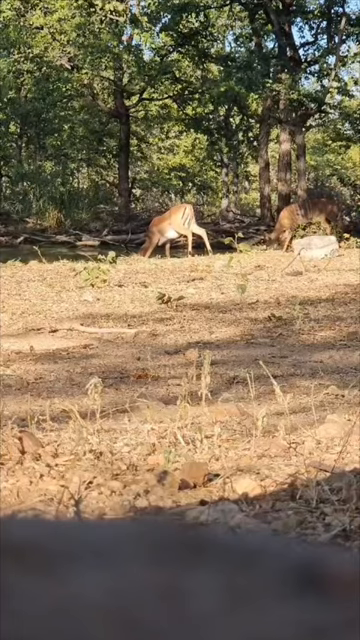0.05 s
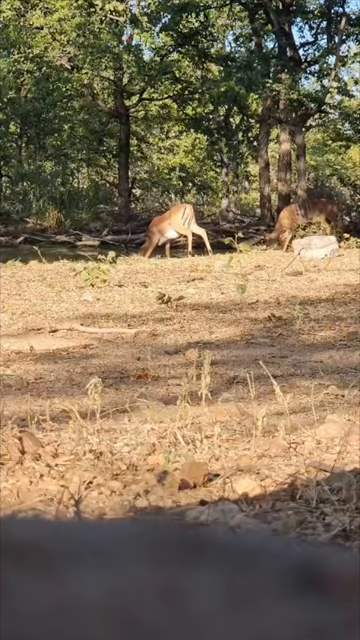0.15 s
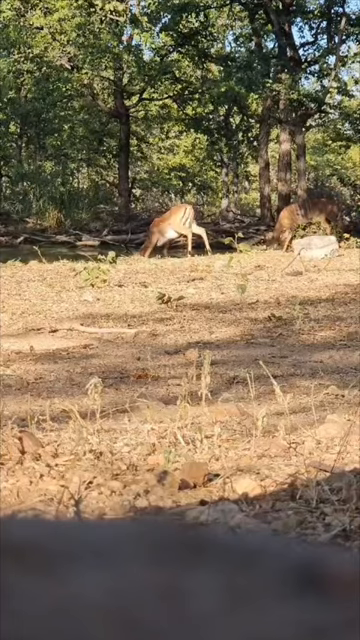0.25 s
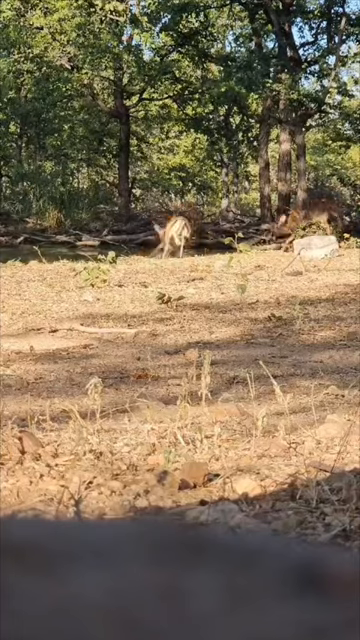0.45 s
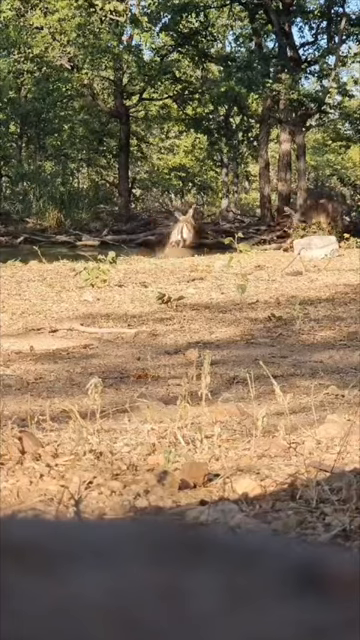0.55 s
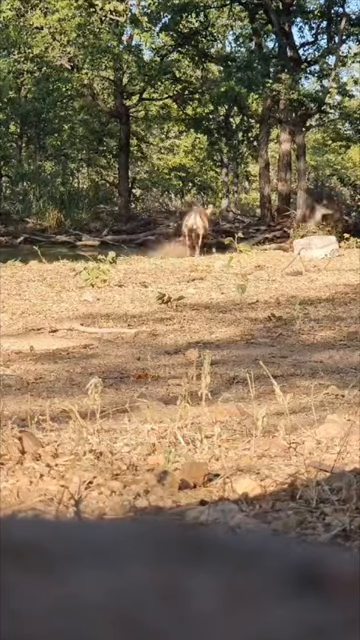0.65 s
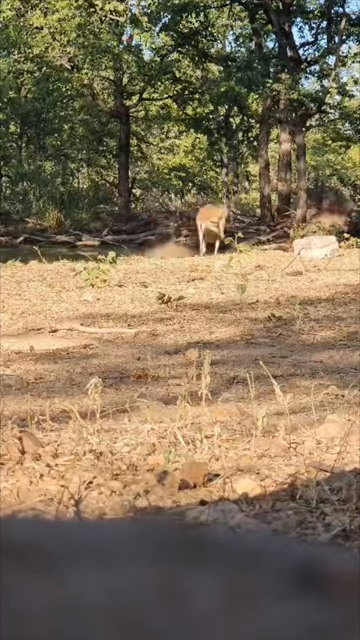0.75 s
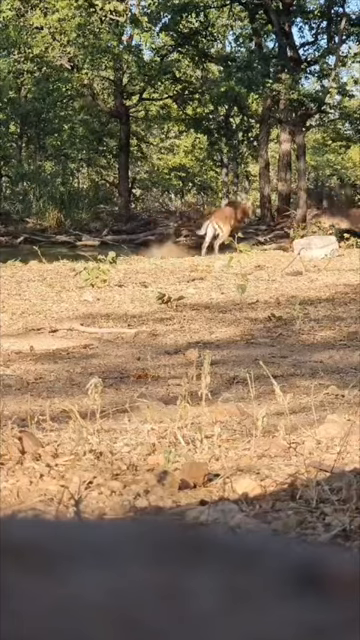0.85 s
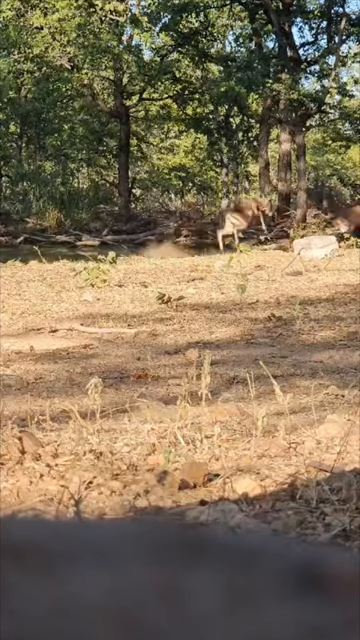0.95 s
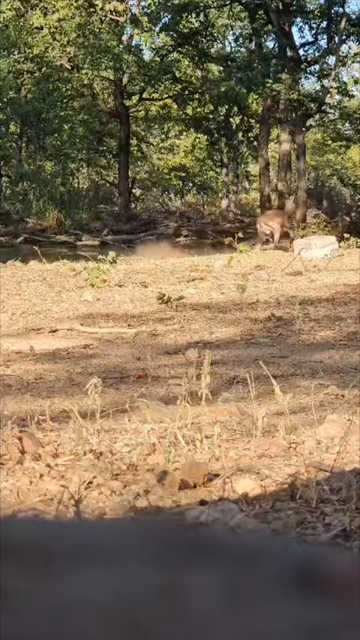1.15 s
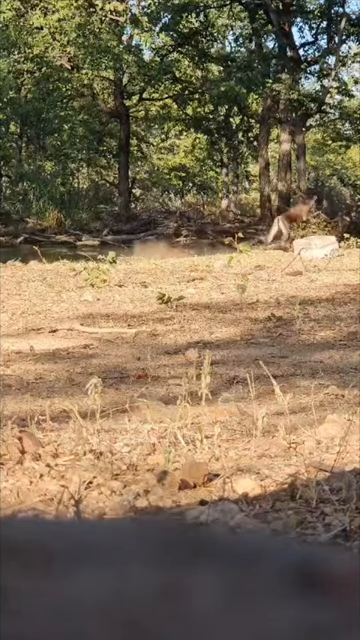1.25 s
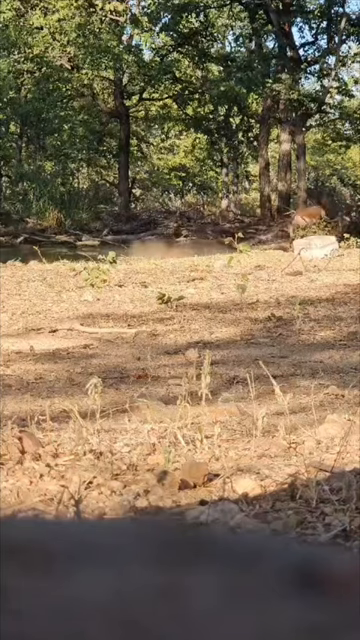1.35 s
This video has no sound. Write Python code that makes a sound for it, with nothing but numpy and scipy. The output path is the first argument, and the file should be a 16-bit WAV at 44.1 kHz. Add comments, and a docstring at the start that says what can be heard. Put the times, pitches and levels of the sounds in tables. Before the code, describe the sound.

Close to the microphone in a small hide, a bow shoots with a brief scrape and a loud, rattling twang. A quieter arrow hit follows out in the bush, and antelope bolt with soft thuds and dry rustling.

```python
"""A bow is shot inside a small hide: the arrow scrapes over its rest, the string slams home and twangs,
the fittings clack and ring, and the hide booms. The arrow hisses off and a quarter of a second later
smacks into an antelope, echoing from bush and tree line. The animals bolt over dry ground, hooves
thudding and scuffing. Whatever rings is a set of wavering sines; the rest is shaped noise."""
import sys
import numpy as np
from scipy import signal
from scipy.fft import rfft, irfft, next_fast_len
from scipy.io import wavfile
from scipy.ndimage import uniform_filter1d, minimum_filter1d, map_coordinates

SR = 44100
rng = np.random.default_rng(int(sys.argv[2]) if len(sys.argv) > 2 else 0)


def output_pcm(signal):
    """Save a mono or channel-first signal as 16-bit PCM at the path in sys.argv[1].

    Samples are clipped to [-1, 1] before scaling.
    """
    pcm = np.clip(np.atleast_2d(signal).T, -1, 1) * 32767
    wavfile.write(sys.argv[1], SR, np.round(pcm).astype(np.int16))


N = 61739
LOOSE_S, STOP_S, HIT_S = .1995, .2238, .4765  # string let go, string slams home, arrow lands


def amp(db):
    """Decibels to gain."""
    return 10 ** (np.asarray(db) / 20)


def unit(x):
    """Scale to rms 1."""
    return x / np.sqrt(np.mean(x ** 2) + 1e-20)


def along(points, hz):
    """Read a curve of (f/Hz, value) points on a log frequency axis."""
    freqs, values = np.transpose(points)
    return np.interp(np.log(hz + 1), np.log(freqs + 1), values)


def since(s):
    """Seconds after s, zero before."""
    return np.maximum(np.arange(N) / SR - s, 0)


def rise(s, attack):
    """A smooth fade-in that starts at s."""
    return np.sin(np.pi / 2 * np.minimum(since(s) / attack, 1)) ** 2


def fall(s, t60):
    """Full level until s, then an exponential decay."""
    return np.exp(-np.log(1000) * since(s) / t60)


def pan(db):
    """Stereo gains that put the left db above the right."""
    return amp(np.array([[db], [-db]]) / 2)


def filtered(x, response):
    """EQ x with a gain that is a function of frequency."""
    size = next_fast_len(N + SR // 2)
    return irfft(rfft(x, size) * response(np.fft.rfftfreq(size, 1 / SR)), size)[..., :N]


# Stereo image of the noise: f/Hz, left-right correlation
CORRELATION = [(30, 0.37), (100, 0.77), (180, 0.81), (400, 0.44), (800, 0.15), (2000, 0), (16000, 0.057)]
def noise(eq):
    """Stereo noise of rms 1 coloured by eq, narrow in the bass and wide in the treble."""
    def mid_side(hz):
        angle = np.arccos(np.clip(along(CORRELATION, hz), -1, 1)) / 2
        return amp(along(eq, hz)) * [np.cos(angle), np.sin(angle)]
    mid, side = filtered(rng.standard_normal((2, N)), mid_side)
    return unit(np.array([mid + side, mid - side]))


def tail(s, eq, t60s, ripple_db=3):
    """Reverb tail: noise whose uneven bands die at their own speeds after s."""
    hz, t, bands = signal.stft(noise(eq), SR, nperseg=512)
    fade = np.exp(-np.log(1000) * np.maximum(t - s, 0) / along(t60s, hz)[:, None])
    ripple = amp(ripple_db * rng.standard_normal(len(hz)) * np.minimum(hz / 1500, 1))
    return signal.istft(bands * fade * ripple[:, None], SR, nperseg=512)[1][:, :N]


def wobble(depth=.22, rate_hz=30):
    """Smooth random modulation."""
    return depth * map_coordinates(rng.standard_normal(200), [since(0) * rate_hz], mode="wrap")


def tone(s, hz, skew):
    """A sine wavering in level and phase, skew radians ahead on the left and behind on the right."""
    phase = 2 * np.pi * hz * since(s) + np.array([[skew], [-skew]])
    return np.exp(wobble()) * np.sin(phase + wobble())


def ring(s, modes, attack, skew_per_hz=.0003):
    """Modes that swell from s and die away; high ones spread wider in phase."""
    sound = 0
    for hz, db, t60, side in modes:
        skew = rng.standard_normal() * skew_per_hz * hz
        sound += amp(db) * pan(side) * tone(s, hz, skew) * fall(s + attack, t60)
    return rise(s, attack) * sound


# Ambience EQ: f/Hz, level/dB
AIR_EQ = [(25, -10), (60, -6.5), (140, -4), (300, -12), (560, -16), (1200, -22), (2500, -28.5),
          (8000, -33.5), (12000, -45.5), (16000, -51)]
def air():
    """Still air lays a faint, dark bed under everything."""
    return amp(-66) * noise(AIR_EQ)


# Friction EQ of shaft on rest: f/Hz, level/dB
SCRAPE_EQ = [(60, -20), (130, 5), (200, 6), (380, -1), (650, -12), (1400, -14), (3000, -13), (4400, -8),
             (6000, -15), (7700, -8), (9600, -16), (13000, -15), (16000, -20)]
def scrape(start_db=-32.5, swell_db_per_s=410):
    """The arrow rubs over the rest, louder as it speeds up."""
    push = amp(start_db + swell_db_per_s * np.minimum(since(LOOSE_S), STOP_S - LOOSE_S))
    return push * rise(LOOSE_S, .00056) * fall(STOP_S, .03) * noise(SCRAPE_EQ)


# Hits of the bow's fittings: t/s, level/dB
CLACK_HITS = [(.2103, -30), (.2247, -11), (.2352, -12), (.2446, -15), (.2523, -18), (0.2646, -20),
              (0.275, -25.5)]
# Clack EQ: f/Hz, level/dB
CLACK_EQ = [(300, -14), (1200, -2.5), (2000, -5.5), (3400, -9.5), (4200, 10), (5200, -9.5), (8000, -9),
            (10000, -16), (12500, -10), (16000, -16)]
# Ring of the fittings: f/Hz, relative level/dB, t60/s, pan/dB
FITTING_MODES = [(992, -8, .2, -0.5), (1131, -4, .21, -2.5), (2523, -5, .22, 0), (3094, -14.5, 0.16, 3.5),
                 (3495, -13, 0.19, -6.5), (4157, -2, .18, -4), (4330, -7, .16, -3)]
def rattle(hold_s=.0013, t60=.0088):
    """The bow's fittings clack in a quick cluster and ring on."""
    hits = sum(amp(db) * rise(s, .00086) * fall(s + hold_s, t60) for s, db in CLACK_HITS)
    return hits * noise(CLACK_EQ) + amp(-19) * ring(STOP_S, FITTING_MODES, attack=.014)


# Partials of string and limbs: multiple of the pitch, level/dB, pan/dB
STRING_PARTIALS = [(.45, -22.5, 1.5), (.97, -7.5, -1.5), (2.02, -8, -2), (2.98, -33.5, 0.5),
                   (4.05, -36, -0.5)]
def twang(s=.216, pitch_hz=192.9, hold_s=.05, left_lead_s=.00022):
    """String and limbs swing briefly on one low note."""
    string = sum(amp(db) * pan(side) * tone(s, k * pitch_hz, np.pi * k * pitch_hz * left_lead_s)
                 for k, db, side in STRING_PARTIALS)
    return string * rise(s, .016) * fall(s + hold_s, t60=.16)


# Snap EQ: f/Hz, level/dB
SNAP_EQ = [(1500, -23.5), (4000, -8), (9000, -4.5), (12500, 1.5), (16000, -7.5)]
def snap():
    """A bright transient as the arrow leaves the string."""
    return amp(-26) * pan(7.5) * rise(STOP_S, .001) * fall(STOP_S, t60=.09) * noise(SNAP_EQ)


# Reverb EQ inside the hide: f/Hz, level/dB
WASH_EQ = [(30, -15), (45, -12.5), (70, 0.5), (150, 9.5), (400, 9), (700, 1), (1200, -4.5), (1900, -7.5),
           (3000, -5), (4300, -4), (5300, -12), (9000, -13), (9600, -22), (12500, -13.5), (16000, -23.5)]
# Its decay times: f/Hz, t60/s
WASH_DECAY = [(40, 0.19), (100, 0.53), (300, 0.59), (800, 0.33), (2500, 0.27), (4300, 0.22), (6000, .19),
              (14000, 0.15)]
def wash(hold_s=.033):
    """The hide's walls smear the shot into a short reverb."""
    return amp(-15.5) * rise(STOP_S, .008) * tail(STOP_S + hold_s, WASH_EQ, WASH_DECAY)


# Fletching EQ: f/Hz, level/dB
FLIGHT_EQ = [(500, -9), (2500, 1), (4500, -5), (8000, -1), (11000, -4), (15000, -6.5)]
def flight():
    """Air hisses over the fletching until the arrow lands."""
    return amp(-56.5) * rise(STOP_S, .05) * fall(HIT_S, t60=.05) * noise(FLIGHT_EQ)


# Resonances of the hide: f/Hz, level/dB, t60/s, pan/dB
HIDE_MODES = [(89.8, -23, 0.89, -1.5), (122.9, -27.5, 0.75, -1), (150.3, -14, .76, -2.5),
              (194.3, -15.5, 0.72, -3.5), (226, -19, 0.41, -1.5), (266.9, -13, 0.42, -1),
              (299.2, -19.5, .4, 0.5), (346.3, -15.5, 0.48, 0.5), (384.2, -17, .34, -7.5),
              (415.3, -15, 0.31, -0.5), (490, -21, .3, 1), (519.4, -22, .28, -9), (663, -31.5, .36, -5),
              (699, -32.5, 0.33, -1), (839, -30, 0.26, -1.5)]
def boom():
    """The twang sets the small hide booming."""
    return ring(.232, HIDE_MODES, attack=.037)


# Low-end accents: t/s, level/dB, f/Hz
BUMP_HITS = [(.305, -20, 85), (.91, -50, 95)]
def bumps(attack=.02, t60=.15):
    """Two soft bass bumps, one after the shot and one under the hooves."""
    return sum(amp(db) * rise(s, attack) * fall(s + attack, t60) * tone(s, hz, skew=0)
               for s, db, hz in BUMP_HITS)


# Smack EQ: f/Hz, level/dB
SMACK_EQ = [(300, -9), (800, -4.5), (1200, -15.5), (2400, -14.5), (3600, -12.5), (5000, -22), (7000, -12.5),
            (8800, -1.5), (10000, -9.5), (13000, -11.5), (16000, -17.5)]
# Dull thud of the body, hollow knock of the shaft: f/Hz, level/dB, t60/s, pan/dB
THUD_MODES = [(97, -25, .2, 1.5), (155, -22, .14, -7), (252, -23, 0.083, 8), (313, -24.5, 0.1, 0.5),
              (440, -31.5, 0.053, 13), (660, -38, .08, 12.5), (881, -40, .06, 13)]
def impact(hold_s=.0065):
    """The point ticks and smacks home, and the body thuds."""
    tick = amp(-29) * rise(HIT_S, .0004) * fall(HIT_S, t60=.012)
    smack = amp(-33.5) * rise(HIT_S, .0012) * fall(HIT_S + hold_s, t60=.031)
    return pan(8) * (tick + smack) * noise(SMACK_EQ) + ring(HIT_S, THUD_MODES, attack=.0056)


# Echo EQ of the bush: f/Hz, level/dB
BUSH_EQ = [(60, -3), (150, 11.5), (300, 4), (600, -0.5), (900, -5), (1300, -9.5), (2000, -10), (3200, -2),
           (5000, -7.5), (8200, -2.5), (10000, -11), (13000, -6), (16000, -22.5)]
# Its decay times: f/Hz, t60/s
BUSH_DECAY = [(200, 0.72), (500, 0.52), (3000, 0.41), (8000, 0.31), (14000, 0.21)]
def bush_echo():
    """The bush scatters the smack into a darkening tail."""
    return amp(-33) * rise(HIT_S, .005) * tail(HIT_S, BUSH_EQ, BUSH_DECAY)


# Dry, leafy EQ of the tree line, also played by scuffs(): f/Hz, level/dB
LEAF_EQ = [(700, -14), (1200, -2.5), (1600, -7), (2200, -4.5), (3000, -0.5), (4200, -1.5), (5200, -9.5),
           (8300, -6), (10000, -12.5), (13000, -12.5), (16000, -20.5)]
def tree_echo():
    """The tree line answers the hit, long and faint."""
    return amp(-52) * rise(HIT_S, .067) * fall(HIT_S, t60=1.0) * noise(LEAF_EQ)


# Fader ride of the gallop: t/s, level/dB
GALLOP_LEVELS = [(.7, -64.5), (.84, -55.5), (.89, -51), (.93, -48.5), (0.999, -48), (1.049, -54),
                 (1.131, -53), (1.22, -56.5), (1.3, -56), (1.36, -53), (1.4, -59)]
# Ground EQ: f/Hz, level/dB
GROUND_EQ = [(25, -16), (60, -3.5), (110, 0.5), (170, -1), (260, -1), (380, -10), (520, -9.5), (780, -24),
             (1400, -22), (2000, -44)]
def rumble():
    """Running hooves rumble through the ground."""
    level_db = np.interp(since(0), *np.transpose(GALLOP_LEVELS))
    return amp(level_db) * rise(HIT_S, .2) * noise(GROUND_EQ)


# Hoof hits: t/s, level/dB, centre f/Hz
KNOCK_HITS = [(0.614, -58, 970), (0.644, -58.5, 1220), (.815, -61, 620), (0.936, -63, 795),
              (1.045, -61, 553), (1.08, -55.5, 546), (1.185, -59, 580), (1.235, -59.5, 520),
              (1.29, -61, 826), (1.335, -68, 710)]
def knocks(attack=.025, t60=.23, octaves=.42):
    """Hooves strike earth and dead wood, each a hollow band of noise."""
    width = 2 ** octaves
    sound = 0
    for s, db, hz in KNOCK_HITS:
        eq = [(hz / width ** 3, -40), (hz / width, -6), (hz, 0), (hz * width, -9), (hz * width ** 5, -55)]
        sound += amp(db) * rise(s, attack) * fall(s + attack, t60) * noise(eq)
    return sound


# Hoof scuffs: t/s, level/dB, attack/s, t60/s
SCUFF_HITS = [(.917, -56, .045, .42), (1.175, -56.5, .052, .19), (1.27, -65, .07, 0.53)]
def scuffs(grit_db=1.5):
    """Hooves drag through dry litter, gritty swells over a steady rustle."""
    flicker = unit(uniform_filter1d(rng.standard_normal(N), size=90))
    grit = unit(amp(grit_db * flicker))
    swells = sum(amp(db) * rise(s, attack) * fall(s + attack, t60) for s, db, attack, t60 in SCUFF_HITS)
    rustle = amp(-67) * rise(.78, .2)
    return np.hypot(swells, rustle) * grit * noise(LEAF_EQ)


def scene():
    """Shot, hit and fleeing herd over still air."""
    arrow = pan(-1) * (scrape() + flight())
    shot = twang() + boom() + pan(-.41) * (snap() + rattle() + wash())
    hit = impact() + pan(6) * (bush_echo() + tree_echo())
    herd = rumble() + pan(4) * (knocks() + scuffs())
    return air() + arrow + shot + bumps() + hit + herd


def record(dry, top_hz=15850, ceiling=.95, look_ahead_s=.001):
    """Master chain: high cut, a limiter that holds the twang under full scale, high cut again."""
    size = int(look_ahead_s * SR) + 1
    sound = filtered(dry, lambda hz: hz < top_hz)
    safe_gain = np.minimum(1, ceiling / (np.abs(sound).max(axis=0) + 1e-9))
    gain = uniform_filter1d(minimum_filter1d(safe_gain, 2 * size), size)
    return filtered(sound * gain, lambda hz: hz < top_hz)


dry = scene()
out = record(dry)
output_pcm(out)
```